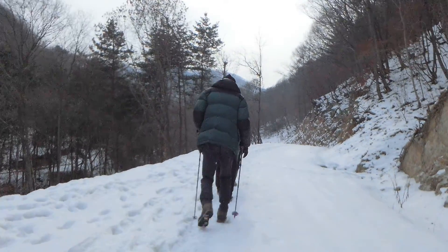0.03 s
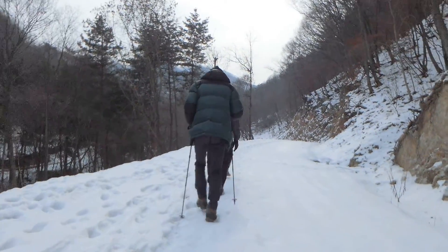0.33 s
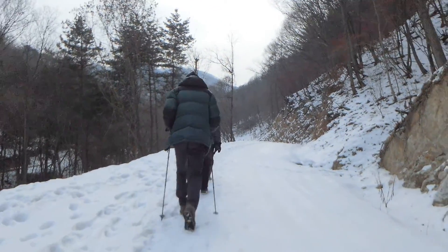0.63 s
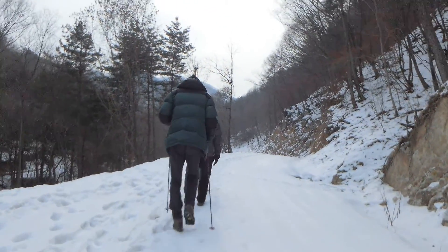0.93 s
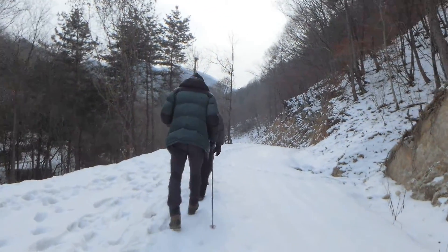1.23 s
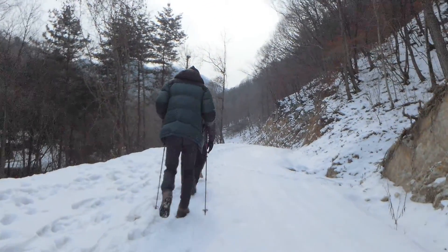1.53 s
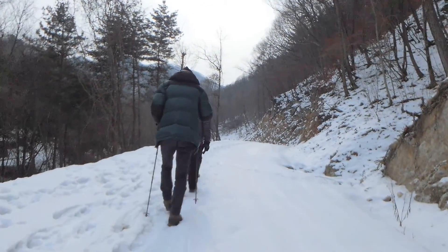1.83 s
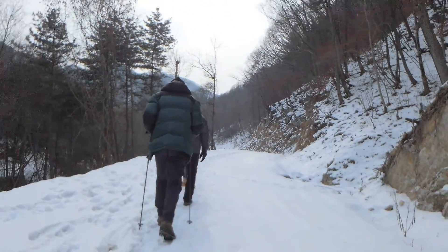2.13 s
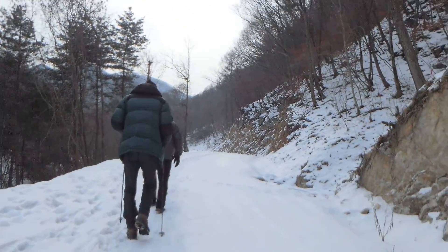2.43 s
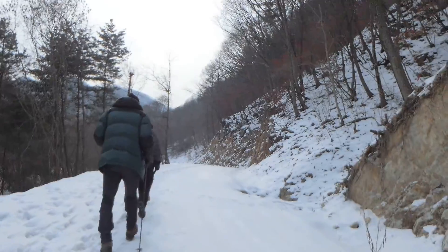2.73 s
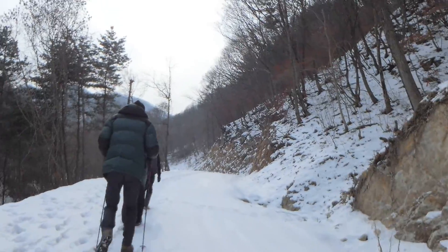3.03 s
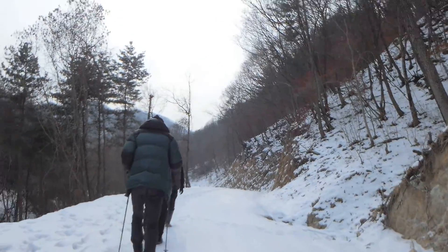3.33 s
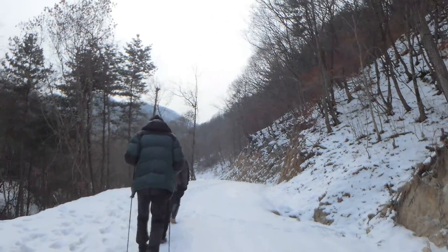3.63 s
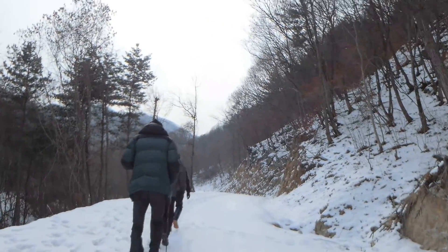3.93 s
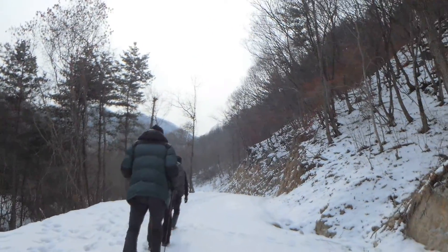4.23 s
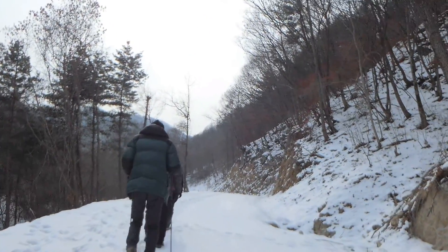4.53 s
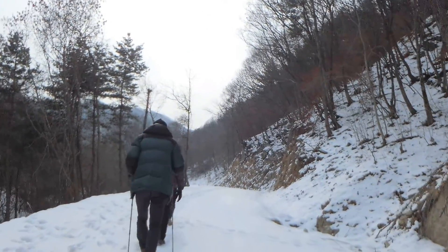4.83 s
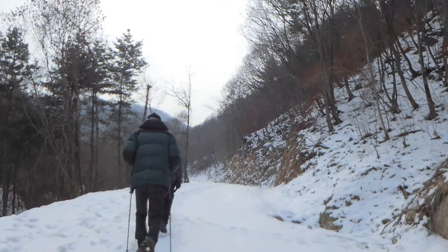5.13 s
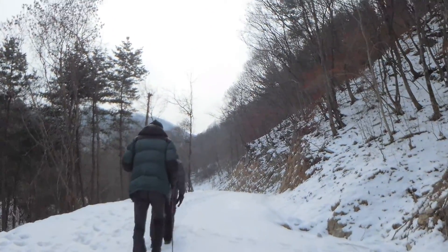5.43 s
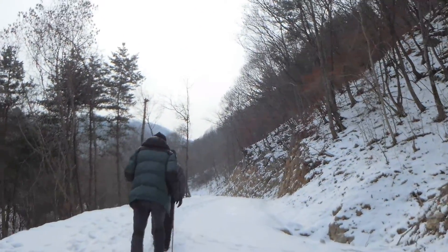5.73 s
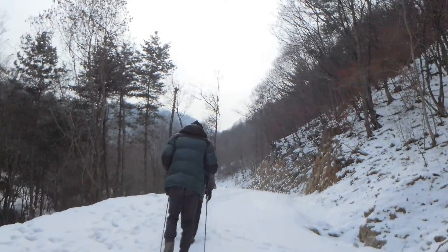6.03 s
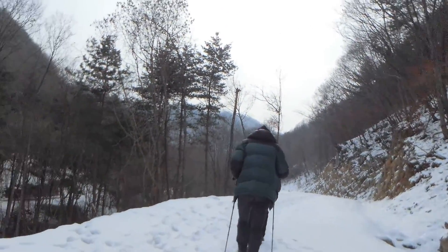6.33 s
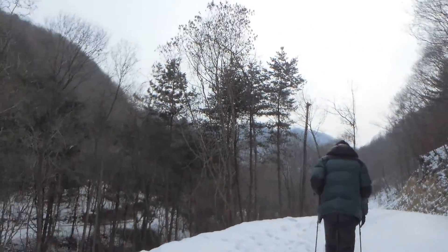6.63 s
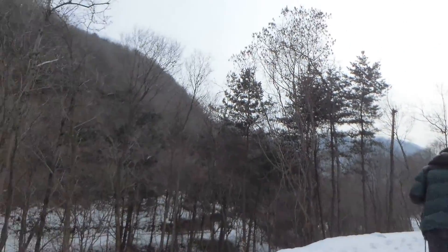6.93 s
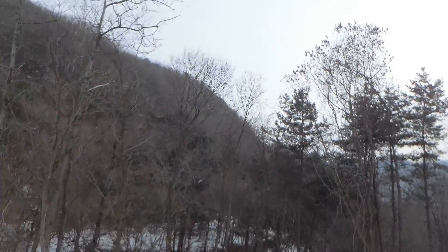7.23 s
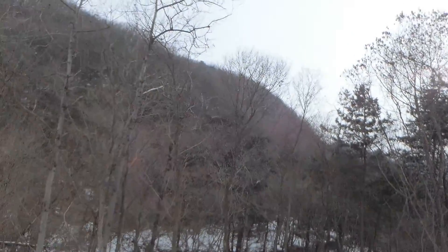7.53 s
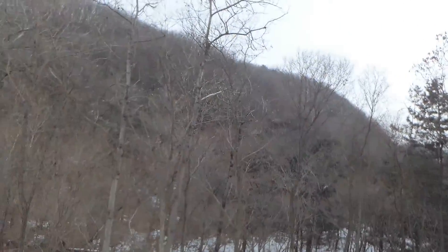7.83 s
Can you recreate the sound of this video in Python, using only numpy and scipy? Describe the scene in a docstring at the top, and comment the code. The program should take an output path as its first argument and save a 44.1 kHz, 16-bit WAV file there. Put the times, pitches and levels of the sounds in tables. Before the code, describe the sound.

Boots crunch on cold packed snow throughout, close to a microphone carried by a walker in open air with no echo. The first step lands at about 0.4 seconds, and others follow a little unevenly, roughly every half to two thirds of a second, until about 7.6. Each is a crisp crackle from heel to toe, with light scuffs between. Pockets of snow collapse with dull pops, strongest near 1.0 and 1.5 seconds. Nylon sleeves and trouser legs swish, and a few tiny rough squeaks occur between 1 and 5 seconds. Pole tips tick on ice around 0.6, 1.7, 2.1 and 2.9, several times from 4.4 to 4.9, then at 6.3 and 7.2. Soft low bumps accompany the walking, more often after 6 seconds. The crunch turns slightly duller and lighter after 7 seconds. Faint crackle, wind rumble and airy hiss lie underneath.

```python
"""Boots crunch up a road of cold packed snow as hikers walk with poles, the nearest with the microphone.
Heel, sole and toes crush the crust by brittle fracture, in bursts of tiny clicks, and pockets of snow
collapse with dull pops. Nylon swishes by friction, and stick-slip of snow or nylon gives short squeaks.
Pole tips tick on ice, and soft bumps, a faint wind rumble and the hiss of open air lie underneath."""
import sys
import numpy as np
from scipy import signal
from scipy.fft import rfft, irfft
from scipy.io import wavfile
from scipy.ndimage import uniform_filter1d

SR = 44100
rng = np.random.default_rng(int(sys.argv[2]) if len(sys.argv) > 2 else 0)


def transcribe(signal):
    """Save signal, clipped to [-1, 1], as a 16-bit WAV file at the path in sys.argv[1]."""
    frames = np.atleast_2d(signal).T
    limited = np.clip(frames, -1, 1)
    pcm = np.round(limited * 32767).astype(np.int16)
    wavfile.write(sys.argv[1], SR, pcm)


N = 356328
TAPS = 2 ** 11  # samples in an impulse response


def amp(db):
    """Amplitude ratio of a level in decibels."""
    return 10 ** (np.asarray(db) / 20)


def unit(x):
    """Normalisation to an RMS of 1."""
    return x / np.sqrt(np.mean(x ** 2) + 1e-20)


def gain_at(spectrum, hz):
    """Gain of a spectrum, interpolated on a log-frequency axis."""
    f, db = np.transpose(spectrum)
    return amp(np.interp(np.log(hz + 1), np.log(f + 1), db))


def add(mix, s, sound):
    """Superposition: a sound joins the mix at s seconds."""
    part = mix[max(round(s * SR), 0):][:len(sound)]
    part += sound[:len(part)]


def wander(size, rate_hz):
    """Random modulation of unit variance, linear between knots."""
    position = np.arange(size) * rate_hz / SR + rng.random()
    count = int(position[-1]) + 2
    return np.interp(position, np.arange(count), rng.standard_normal(count)) * np.sqrt(3 / 2)


def ring(spectrum, band, order=12):
    """Minimum-phase impulse response, of energy 1, of one band of a spectrum."""
    hz = np.fft.rfftfreq(TAPS, 1 / SR)
    skirts = np.sqrt((1 + (band[0] / (hz + 1)) ** order) * (1 + (hz / band[1]) ** order))
    gain = gain_at(spectrum, hz) / skirts
    log_gain = np.log(np.maximum(gain / gain.max(), 1e-4))
    log_transfer = signal.hilbert(np.r_[log_gain, log_gain[-2:0:-1]]).conj()
    response = np.fft.ifft(np.exp(log_transfer)).real
    return response / np.linalg.norm(response)


def grains(size, per_s, spread_db):
    """Poisson process of clicks: many small ones and a few large."""
    sizes = amp(spread_db * np.minimum(rng.exponential(1, size), 4))
    return sizes * rng.choice([-1, 1], size) * (rng.random(size) < per_s / SR)


# Treble, middle and body bands of the grains: lower f/Hz, upper f/Hz
GRAIN_BANDS = [(7000, 20000), (1300, 7000), (200, 1300)]


def strokes(rows, spectra, per_s, spread_db, slip_hz, slip_db, release_s, patchy_db,
            build_db=-6, build_s=0.0033, trickle_db=-13, trickle_s=0.042, lead_s=0.012):
    """Shot noise: bursts of grains in three bands, clumped by shared slips and by each band's own."""
    drives = np.zeros((len(GRAIN_BANDS), N))
    for start, end, rise_s, swell_db, *levels_db in rows:
        length = max(end - start, 0.005)
        t = np.arange(-min(lead_s, abs(start)), length + 4 * trickle_s, 1 / SR)
        shape = amp(swell_db * np.clip(t / length, 0, 1)) * (1 + np.tanh(t / rise_s))
        shape *= amp(build_db * np.exp(-np.maximum(t, 0) / build_s))  # the load builds after contact
        lifted = np.maximum(t - length + release_s / 2, 0)
        shape *= np.exp(-lifted / release_s) + amp(trickle_db) * np.exp(-lifted / trickle_s)
        shape *= amp(slip_db * wander(len(t), slip_hz))
        for drive, db, rate in zip(drives, levels_db, per_s):
            clicks = grains(len(t), rate, spread_db)
            burst = unit(shape * clicks * amp(patchy_db * wander(len(t), slip_hz)))
            add(drive, start + t[0], amp(db) * np.sqrt(length * SR / len(t)) * burst)
    return sum(signal.oaconvolve(drive, ring(spectrum, band))[:N]
               for drive, spectrum, band in zip(drives, spectra, GRAIN_BANDS))


def press(start, length, db, depth_db, swell_db, rise_s=0.0033):
    """Compaction, as one stroke: the deeper the boot sinks, the more grit and packing under the fizz."""
    grit_db = db - 5 + 0.42 * depth_db
    return start, start + length, rise_s, swell_db, db, grit_db, db + depth_db


# Boots skimming the crust: start t/s, duration/s, fizz level/dB, depth/dB (dull packing re fizz)
BOOT_SCUFFS = [(0, 0.015, -36.5, -10), (0.04, 0.024, -38.5, -7.5), (0.737, 0.031, -35, -7.5),
               (0.804, 0.017, -33.5, -9), (1.081, 0.041, -32, -9), (1.11, .05, -42, -12),
               (1.194, 0.025, -35, -13.5), (1.482, 0.032, -31, -5.5), (1.85, 0.027, -34.5, -10.5),
               (1.898, 0.095, -37.5, -6.5), (2.164, .09, -42, -5), (3.082, 0.052, -49, -10),
               (3.174, 0.013, -41, -6), (3.225, 0.016, -39.5, -12), (4.48, 0.024, -41, -3),
               (4.776, 0.044, -33.5, -13.5), (4.827, 0.036, -31, -13), (5.287, 0.079, -31, -12),
               (5.368, 0.096, -42.5, -9.5), (5.972, 0.1, -45, -6), (6.056, 0.081, -29, -14),
               (6.199, 0.18, -54, 2), (6.908, 0.029, -41.5, -7), (6.982, 0.024, -38, -15),
               (7.202, 0.026, -33.5, -21), (7.602, 0.0056, -26.5, -18), (7.667, 0.014, -30.5, -15)]
# Heels breaking the crust: start t/s, duration/s, fizz level/dB, depth/dB, swell from start to end/dB
HEEL_STRIKES = [(.375, 0.027, -24.5, -7, -4.5), (.836, .056, -32, -8, 6), (1.517, 0.021, -25, -1.5, -16),
                (2.001, 0.034, -29, -15.5, -5), (2.678, 0.052, -30, -6.5, 0), (3.313, 0.046, -34, -2, 2),
                (3.932, 0.054, -30.5, -6, 0.5), (4.597, 0.042, -32.5, -4, -14),
                (5.152, 0.052, -28, -9.5, -1), (5.688, 0.16, -34.5, -7.5, -1),
                (6.407, 0.083, -26, -8.5, -3.5), (7.016, .049, -31.5, -6, -1), (7.538, .018, -33.5, -2, -8)]
# Soles taking the weight: start t/s, duration/s, fizz level/dB, depth/dB, swell/dB, toe roll/s
SOLE_LOADS = [(0.425, 0.084, -34.5, -6.5, -1, 0.0085), (0.895, 0.13, -26, -8, -2, 0.047),
              (1.569, 0.056, -29, -6.5, 3.5, .005), (2.081, 0.041, -30, -7.5, 1, 0.017),
              (2.77, 0.031, -30.5, -9.5, -11, 0.07), (3.418, 0.076, -36.5, -9, 2, 0.04),
              (4.025, .046, -29, -4.5, 0.5, 0.066), (4.672, 0.059, -31.5, -6, -4, 0.039),
              (5.211, .07, -26, -4.5, -11, 0.092), (5.843, 0.04, -29.5, -3.5, -3, 0.092),
              (6.556, 0.12, -36.5, -4.5, -7.5, .045), (7.07, 0.15, -36, -12.5, -9.5, 0.049),
              (7.601, 0.043, -38.5, 1.5, 2, .01)]


def footwork(arch_db=-12, roll_db=-11):
    """Load transfer: each step lands on the heel, tips onto the sole and rolls off; boots also scuff."""
    rows = [press(*scuff, swell_db=-7, rise_s=0.0014) for scuff in BOOT_SCUFFS]
    for heel, sole in zip(HEEL_STRIKES, SOLE_LOADS):
        heel_s, heel_length, heel_db = heel[:3]
        sole_s, sole_length, sole_db, depth_db, swell_db, roll_s = sole
        arch_s = heel_s + heel_length
        rows += [press(*heel, rise_s=0.00069),  # the heel bites at once
                 press(arch_s, sole_s - arch_s, heel_db + arch_db, depth_db, swell_db=0),
                 press(sole_s, sole_length, sole_db, depth_db, swell_db),
                 press(sole_s + sole_length, roll_s, sole_db + roll_db, depth_db, swell_db=-6)]
    return rows


# Spectrum of snapping ice bonds: f/Hz, relative level/dB
ICE_SPECTRUM = [(2940, -34), (5000, -1.5), (5900, -7.5), (6530, -5.5), (7600, -11), (9410, 2.5), (10300, 3),
                (13500, -3.5), (15000, -9.5), (16000, -24)]
# Spectrum of breaking snow clumps: f/Hz, relative level/dB
SNOW_SPECTRUM = [(120, -19.5), (200, -5.5), (683, 1), (1080, -2), (1290, -13), (1500, -7.5), (2760, -9),
                 (3020, -14.5), (5060, -11.5), (5620, -17.5), (6540, -19.5), (7500, -16.5), (9750, -48),
                 (16500, -120)]


def crunch():
    """Brittle fracture: ice bonds snap by the thousand; larger clumps break more seldom, and lower."""
    return strokes(footwork(), [ICE_SPECTRUM, SNOW_SPECTRUM, SNOW_SPECTRUM], per_s=[10000, 5000, 1700],
                   spread_db=3.5, slip_hz=256, slip_db=1.0, release_s=0.0033, patchy_db=0.2)


def crumbs(level_db=-56, snow_db=-2):
    """Sparse shot noise: loose crumbs and the steps of the walkers ahead keep up a faint crackle."""
    clicks = grains(N, per_s=900, spread_db=3.5) * amp(3.5 * wander(N, 90) + 3 * wander(N, 12))
    colour = ring(ICE_SPECTRUM, GRAIN_BANDS[0]) + amp(snow_db) * ring(SNOW_SPECTRUM, (300, 7000))
    return amp(level_db) * unit(signal.oaconvolve(clicks, colour)[:N])


def shifting_gaps(x, depth_db=2.0, frame_count=9, bin_count=4):
    """Cavity resonance: the gaps under a sole keep changing shape, so small peaks come and go."""
    frames = dict(nperseg=256, noverlap=192)
    spectrogram = signal.stft(x, **frames)[2]
    patches = uniform_filter1d(rng.standard_normal(spectrogram.shape), bin_count, axis=0)
    patches = unit(uniform_filter1d(patches, frame_count, axis=1))
    return signal.istft(spectrogram * unit(amp(depth_db * patches)), **frames)[1][:N]


def swaying_noise(spectrum, db, sway_db, sway_hz):
    """Amplitude modulation: coloured noise whose level sways at random."""
    colour = gain_at(spectrum, np.fft.rfftfreq(N, 1 / SR))
    noise = irfft(rfft(rng.standard_normal(N)) * colour, N)
    return amp(db) * unit(noise * amp(sway_db * wander(N, sway_hz)))


# Spectrum of the low rumble: f/Hz, relative level/dB
RUMBLE_SPECTRUM = [(10, -16), (20, -4), (30, 4.5), (40, -11), (60, -6), (120, -10), (190, -11.5),
                   (280, -17.5), (500, -21), (800, -25.5), (1400, -44), (2000, -82), (3000, -110)]
# Course of the gusts: t/s, level/dB
GUST_LEVELS = [(0, -42), (.6, -41.5), (1.5, -41.5), (2.3, -43), (3.5, -41.5), (4.5, -42), (5.3, -44),
               (5.85, -40.5), (6.3, -41), (6.75, -44.5), (7.05, -42), (7.5, -39), (8.08, -41.5)]


def wind():
    """Turbulence: the fluctuating pressure of wind on the microphone makes a rumble."""
    gust_db = np.interp(np.arange(N) / SR, *np.transpose(GUST_LEVELS))
    return swaying_noise(RUMBLE_SPECTRUM, gust_db, sway_db=1.5, sway_hz=18)


# Spectrum of the open-air hiss: f/Hz, relative level/dB
AIR_SPECTRUM = [(590, -51), (1000, 1), (1670, -5), (1770, -3.5), (2330, -5), (2530, -2.5), (3270, -7),
                (5190, -10), (6330, -9.5), (9830, -3.5), (16000, -15)]


def air():
    """Broadband ambient noise: a faint hiss whose level flickers."""
    return swaying_noise(AIR_SPECTRUM, db=-48.5, sway_db=1.6, sway_hz=24.63)


# Bumps of carried gear and heavy footfalls: t/s, level before gain/dB, f/Hz
SOFT_BUMPS = [(.074, -37, 128.4), (0.198, -37, 200), (.378, -36, 228), (1.014, -34, 163), (1.526, -24, 214),
              (2.72, -30, 197.6), (3.835, -34.5, 164.6), (5.888, -28.5, 142.7), (5.916, -30.5, 189),
              (6.321, -30.5, 196), (6.37, -37, 165), (6.595, -33, 153.7), (6.908, -34, 143),
              (6.942, -33.5, 168), (7.023, -26.5, 193), (7.063, -34.5, 174), (7.137, -33.5, 178),
              (7.489, -33.5, 154), (7.608, -31.5, 178)]


def bumps(width_s=0.003, gain_db=3, waver=0.23, shudder_db=-7, shudder_s=0.012, thud_hz=201):
    """Soft impact: a long contact gives only low frequencies, a couple of swings amid a dull shudder."""
    out, t = np.zeros(N), np.arange(-TAPS, TAPS) / SR
    dull = ring(RUMBLE_SPECTRUM, (110, 420))
    thuds = [(s + 0.02, db - 16, thud_hz) for s, _, db, *_ in SOLE_LOADS]  # every sole also thuds
    for s, db, hz in SOFT_BUMPS + thuds:
        turns = np.cumsum(hz * (1 + waver * wander(len(t), 265))) / SR + rng.random()
        swing = np.exp(-(t / width_s) ** 2 / 2) * np.sin(2 * np.pi * turns)
        rumble = unit(signal.fftconvolve(rng.standard_normal(len(t)), dull)[:len(t)])
        shudder = amp(shudder_db) * rumble * np.exp(-(t / shudder_s) ** 2)
        add(out, s + t[0], amp(db + gain_db) * (swing + shudder))
    return out


# Strokes of rubbing sleeves: start t/s, duration/s, treble level/dB, middle re treble/dB
SLEEVE_RUBS = [(0.527, 0.038, -28, -8), (0.563, 0.15, -40.5, -1.5), (1.277, .07, -38.5, -3),
               (1.35, .1, -42, -2), (2.422, 0.22, -52, -1), (2.846, 0.072, -47, 3), (3.495, 0.13, -47, -3),
               (4.14, 0.085, -43.5, -1.5), (4.245, 0.046, -42, -1.5), (4.311, 0.061, -51.5, 4),
               (4.914, 0.01, -26, -9.5), (4.982, 0.18, -51.5, 3), (5.476, 0.016, -37, 1.5),
               (5.521, 0.054, -35, -5), (7.701, 0.13, -37.5, -9.5), (7.864, 0.065, -43, -7)]
# Brush of the trouser legs: treble level/dB, middle level/dB, body level/dB
LEG_LEVELS = [-50, -56.5, -53]
# Spectrum of rubbing nylon: f/Hz, relative level/dB
NYLON_SPECTRUM = [(180, -40), (300, -10), (494, -3), (528, -11.5), (762, -2), (1610, -11.5), (2170, -7),
                  (4750, -12), (5160, -7.5), (5700, -13), (6520, -8), (7200, -3), (9710, 14), (12900, 8.5),
                  (16000, -6)]


def clothing(sleeve_rise_s=0.004, sleeve_swell_db=-3, body_db=-9.5, leg_rise_s=0.0026, leg_swell_db=9.5):
    """Sliding friction: nylon threads flick over each other so densely that they blur into a hiss."""
    sleeves = [(s, s + length, sleeve_rise_s, sleeve_swell_db, db, db + mid_db, db + mid_db + body_db)
               for s, length, db, mid_db in SLEEVE_RUBS]
    # the legs brush past each other just before each heel lands
    legs = [(s - 0.16, s - 0.02, leg_rise_s, leg_swell_db, *LEG_LEVELS) for s, *_ in HEEL_STRIKES]
    return strokes(sleeves + legs, [NYLON_SPECTRUM] * 3, per_s=[14000, 10000, 4000],
                   spread_db=5.5, slip_hz=123.3, slip_db=2.1, release_s=0.0083, patchy_db=4.0)


# Pockets of snow giving way: t/s, peak level of the push/dB, f/Hz, crust crack re push/dB
SNOW_POCKETS = [(0.3764, -20.5, 540, -3), (.9498, -8, 507, -19), (1.003, -18, 660, -15),
                (1.1162, -17, 776, -30), (1.52, -14, 910, -8), (1.5234, -10.5, 650, -23),
                (1.527, -8, 540, -7.5), (1.6073, -15.5, 630, -30), (1.6185, -16, 720, -3),
                (1.9564, -23, 785, -27), (2.087, -17.5, 780, -17), (2.1183, -20.5, 720, -15),
                (2.1356, -24, 870, -6), (2.5271, -28, 700, -19), (2.7169, -17, 746, -25),
                (2.7766, -13, 660, -19), (2.8116, -19, 656, -6), (3.4851, -13, 764, -13.5),
                (3.9655, -14.5, 710, -22), (4.1789, -26.5, 790, -4), (4.4293, -26.5, 680, -6),
                (4.4787, -18.5, 790, -8), (4.4985, -26, 800, -13), (4.6312, -20, 590, -17),
                (4.6995, -18.5, 646, -17), (4.7099, -17.5, 710, -17), (5.225, -17.5, 818, -25),
                (5.2538, -15, 696, -30), (6.2441, -27.5, 640, -11), (6.3664, -29, 625, -30),
                (6.4904, -16.5, 765, -30), (6.56, -21, 610, -21), (7.0184, -21.5, 422, -20),
                (7.112, -23, 790, -30)]


def pops(lead_s=0.00386, cycles=0.43, settle_db=-16, settle_s=0.0046, crack_s=0.00092):
    """Cavity collapse: a pocket cracks and expels one short push of air, then the loose snow settles."""
    out, t = np.zeros(N), np.arange(TAPS) / SR - lead_s
    body, ice = ring(SNOW_SPECTRUM, GRAIN_BANDS[2]), ring(ICE_SPECTRUM, (3000, 16000))
    for s, db, hz, crack_db in SNOW_POCKETS + small_pockets():
        push = np.exp(-(t * hz / cycles) ** 2 / 2) * np.cos(2 * np.pi * hz * t + rng.normal(0, 0.69))
        rubble = amp(settle_db) * rng.standard_normal(TAPS) * (t > 0) * np.exp(-abs(t) / settle_s)
        crack = amp(crack_db) * rng.standard_normal(TAPS) * np.exp(-abs(t) / crack_s)
        debris = signal.fftconvolve(rubble, body) + signal.fftconvolve(crack, ice)
        add(out, s - lead_s, amp(db) * (push + debris[:TAPS]))
    return out


def small_pockets(per_s=18, over_packing_db=5, spread_db=3.5, hz=685, spread_octaves=0.12, crack_db=-15):
    """Failure under load: small pockets give way at random, louder as a sole packs the snow harder."""
    return [(start + length * (1 + when) / 2, db + depth_db + over_packing_db + spread_db * size,
             hz * 2 ** (spread_octaves * pitch), crack_db)
            for start, length, db, depth_db, *_ in SOLE_LOADS
            for when, size, pitch in rng.uniform(-1, 1, (round(length * per_s), 3))]


# Pole tips striking ice: t/s, peak level/dB, centre f/Hz, bandwidth/octaves
POLE_STRIKES = [(.615, -17, 10500, 0.51), (1.674, -20, 10000, .3), (2.134, -24.5, 2570, 1.1),
                (2.897, -26.5, 3500, 3.1), (4.403, -32, 2960, 0.68), (4.477, -24, 2470, 0.45),
                (4.6, -18, 5200, 1.4), (4.893, -23, 10000, 0.52), (6.275, -19, 11500, 0.51),
                (7.182, -23, 14000, .4)]


def poles(decay_s=0.001):
    """Hard impact: a tip chips the ice in a millisecond or two, so the tick is bright."""
    out, t = np.zeros(N), np.arange(TAPS) / SR
    for s, db, hz, octaves in POLE_STRIKES:
        edges = np.minimum(hz * 2 ** (np.array([-0.5, 0.5]) * octaves), SR / 2 - 1)
        chip = rng.standard_normal(TAPS) * np.exp(-t / decay_s)
        tick = signal.sosfilt(signal.butter(2, edges, "bandpass", fs=SR, output="sos"), chip)
        add(out, s, amp(db) * tick / abs(tick).max())
    return out


# Short rough squeaks of snow and of rubbing nylon:
# centre t/s, half duration/s, f/Hz, glide/(octaves/s), level before gain/dB
SQUEAKS = [(0.944, 0.035, 2260, 3, -35), (1.322, 0.038, 6600, -3.5, -44), (2.714, .011, 1770, -2, -31.5),
           (2.84, 0.015, 5370, -10, -43), (3.485, 0.0033, 1500, 0, -31), (3.96, .006, 2110, 0, -35),
           (4.196, .022, 9540, -2, -35.5), (4.6, 0.0069, 2454, -5, -33.5), (4.796, 0.014, 2500, -5.5, -40)]


def squeaks(jitter_hz=260, gain_db=3):
    """Stick-slip: for a moment snow or nylon catches and slides in step, giving a rough little squeak."""
    out = np.zeros(N)
    for s, half_s, hz, glide, db in SQUEAKS:
        t = np.arange(-half_s, half_s, 1 / SR)
        turns = np.cumsum(hz * 2 ** (glide * t) + jitter_hz * wander(len(t), 890)) / SR
        add(out, s - half_s, amp(db + gain_db) * np.hanning(len(t)) * np.sin(2 * np.pi * turns))
    return out


def turn_away(x, at_s=7.1, edge_hz=11000, shade_db=-3):
    """Acoustic shadow: the microphone swings off the path and its casing shades the top treble."""
    treble = signal.sosfiltfilt(signal.butter(3, edge_hz, "highpass", fs=SR, output="sos"), x)
    turned = np.arange(N) / SR >= at_s
    return x + treble * turned * (amp(shade_db) - 1)


def scene():
    """Free field: steps, clothing and poles add in open air, with no walls to echo."""
    background = wind() + air()
    walkers = shifting_gaps(crunch() + clothing() + crumbs()) + pops() + squeaks() + bumps() + poles()
    return (turn_away(walkers) + background)[None]


def record(dry):
    """Band limiting: a linear-phase low-pass at 16 kHz."""
    lowpass = signal.firwin(401, 16000, window=("kaiser", 8), fs=SR)
    return signal.oaconvolve(dry, lowpass[None], "same")


dry = scene()
out = record(dry)
transcribe(out)
```